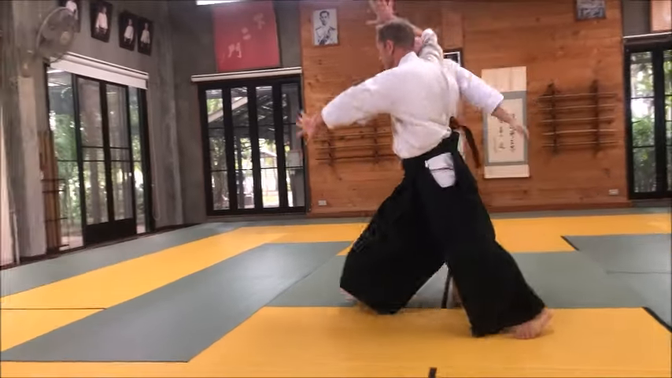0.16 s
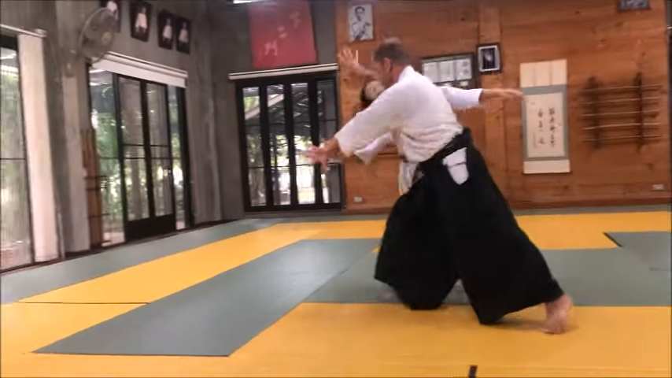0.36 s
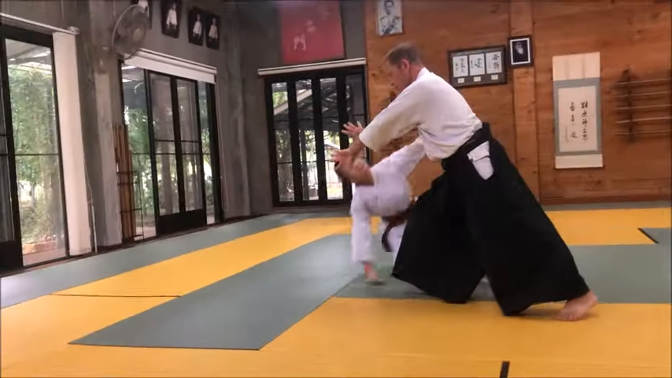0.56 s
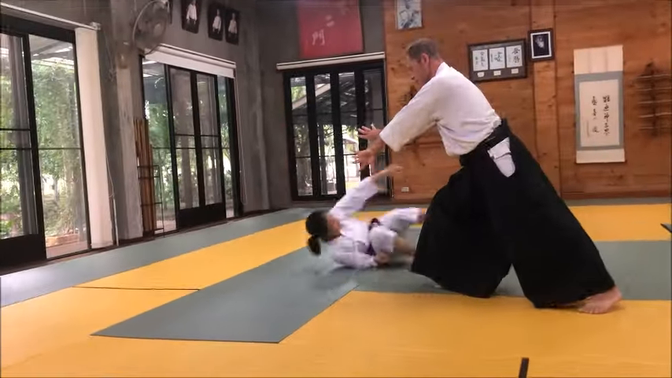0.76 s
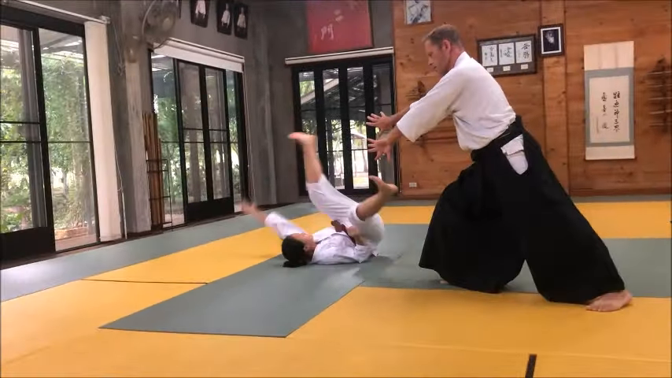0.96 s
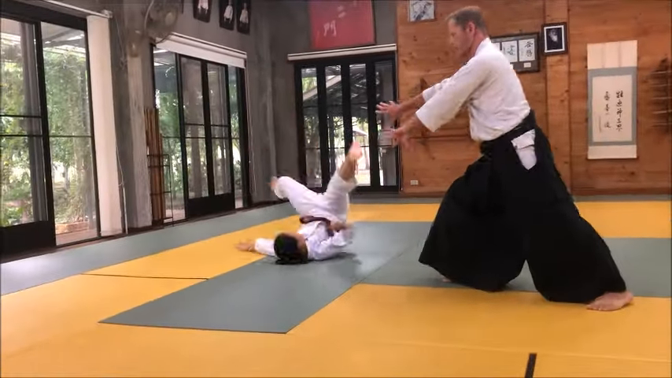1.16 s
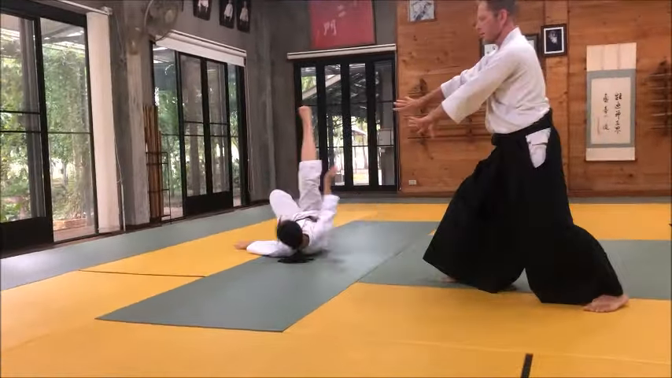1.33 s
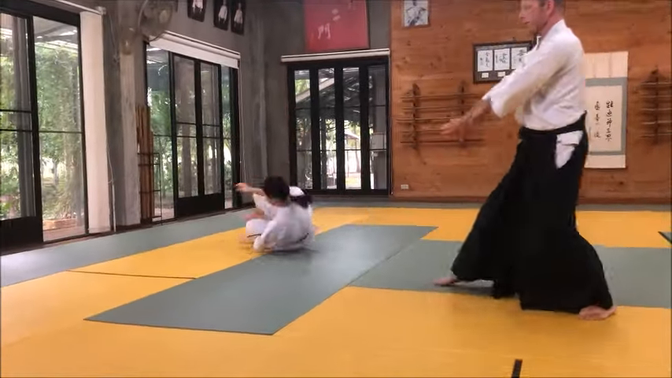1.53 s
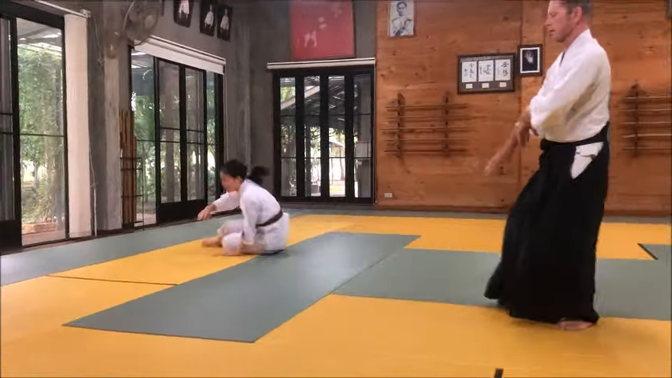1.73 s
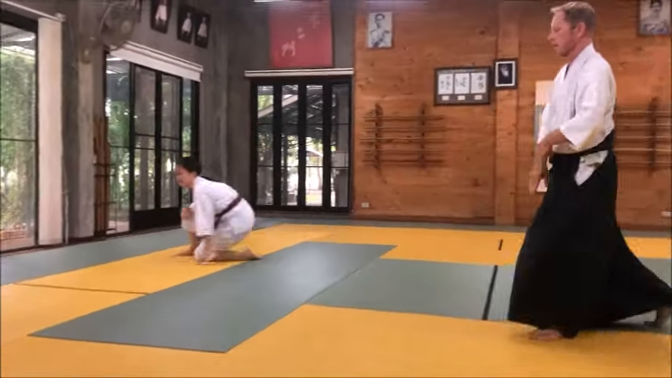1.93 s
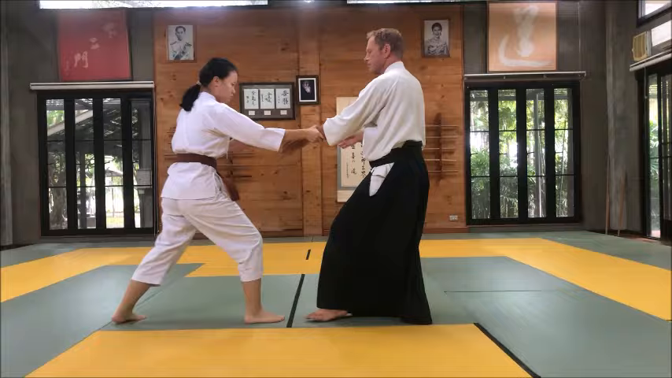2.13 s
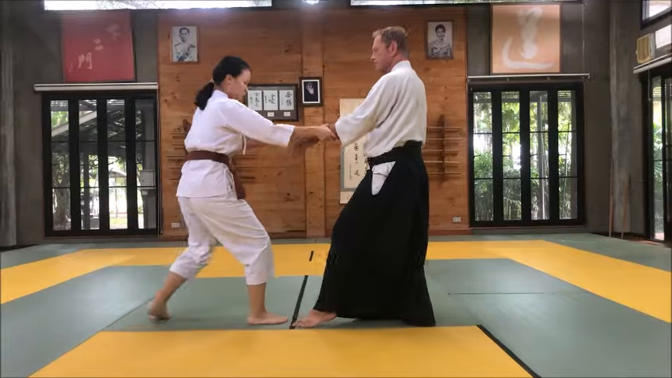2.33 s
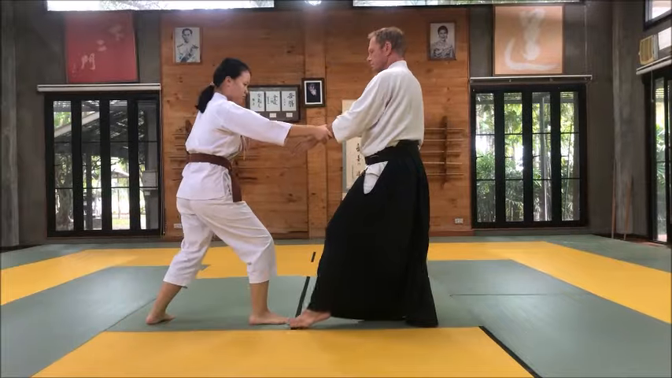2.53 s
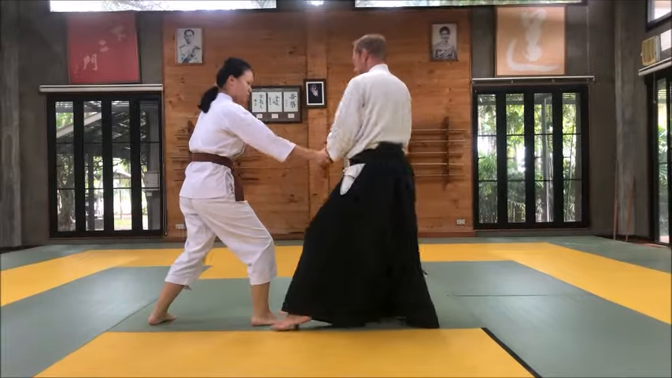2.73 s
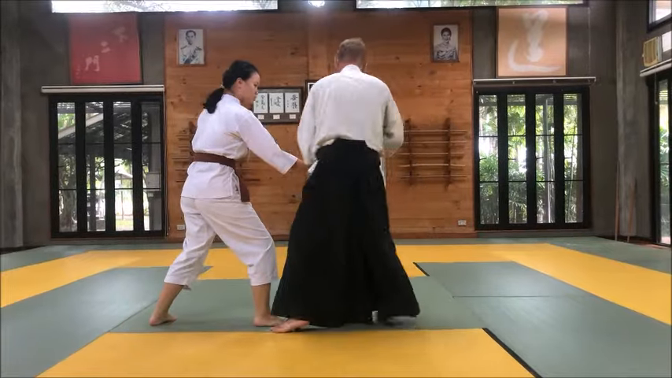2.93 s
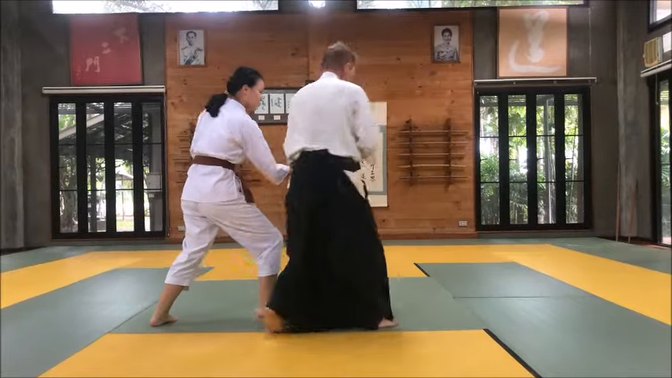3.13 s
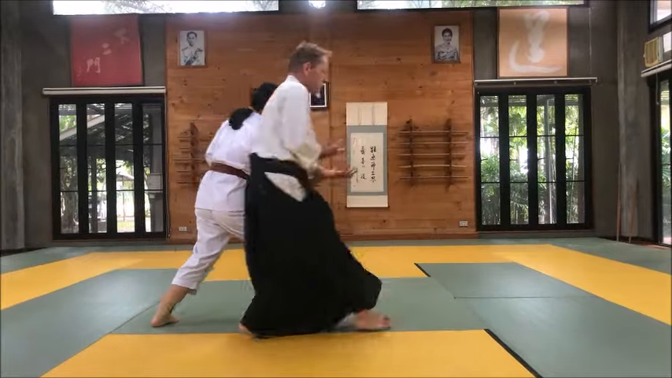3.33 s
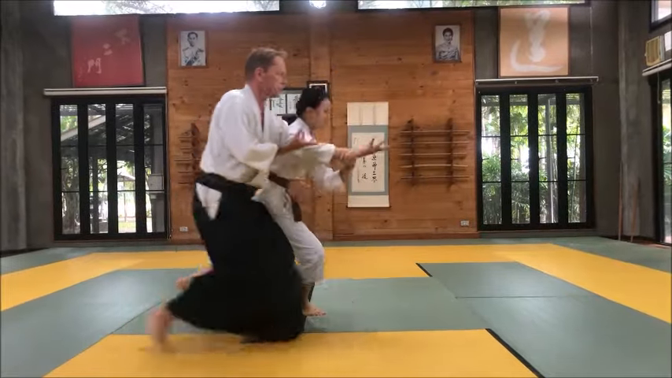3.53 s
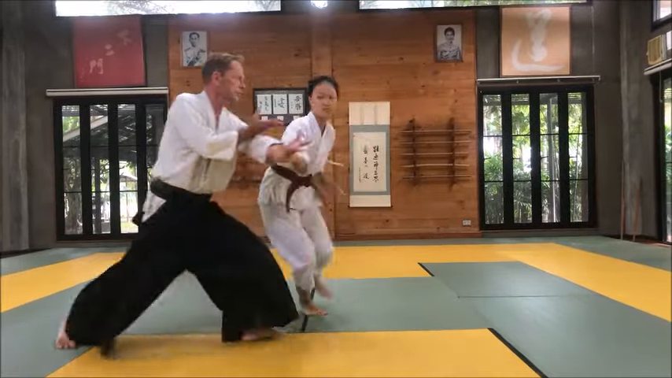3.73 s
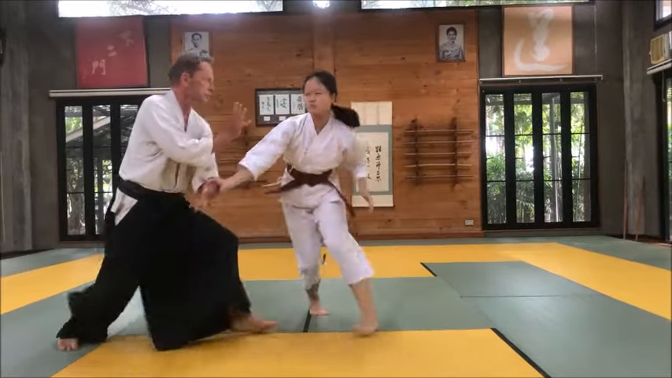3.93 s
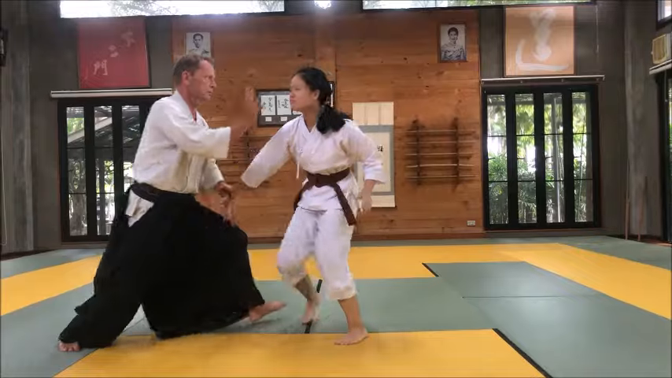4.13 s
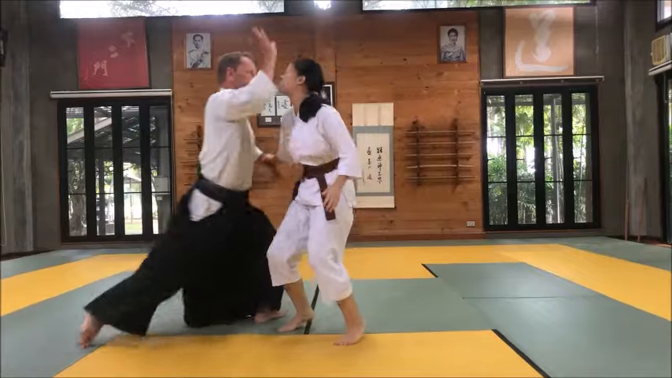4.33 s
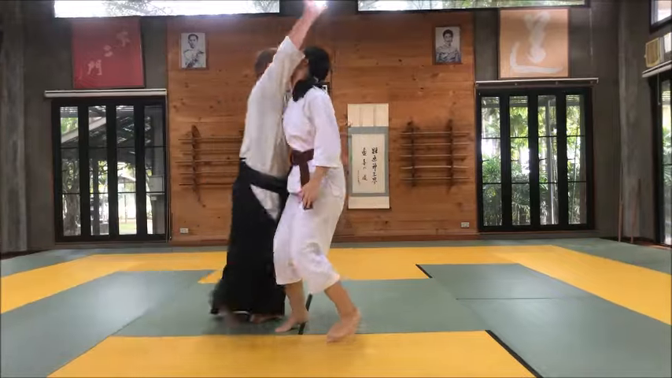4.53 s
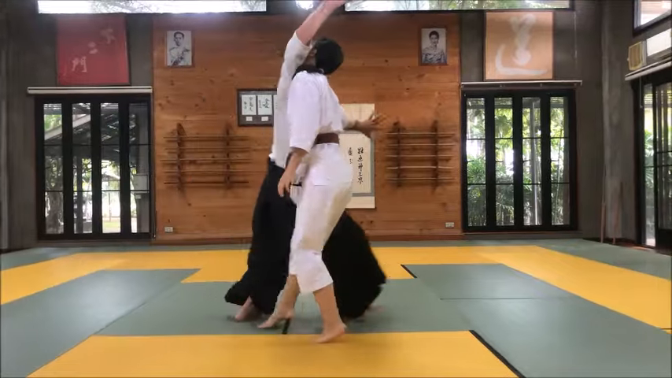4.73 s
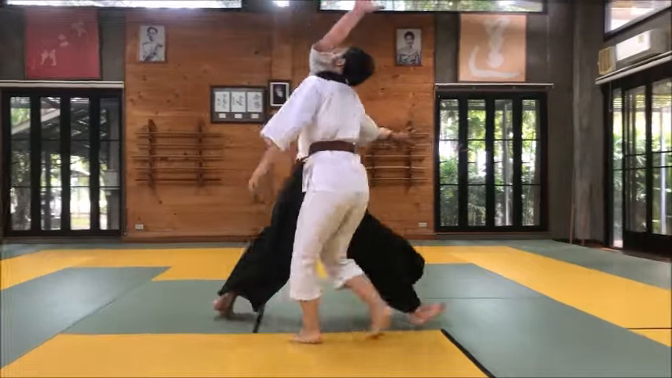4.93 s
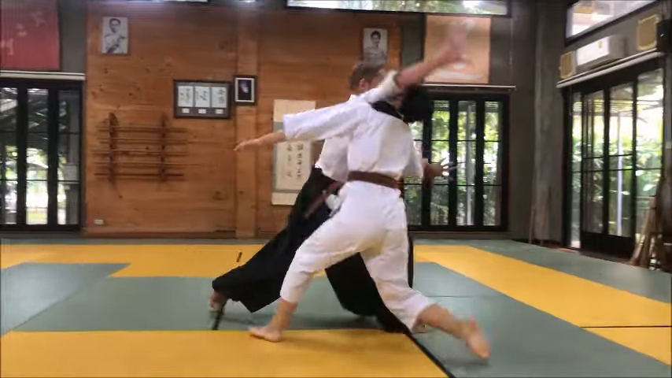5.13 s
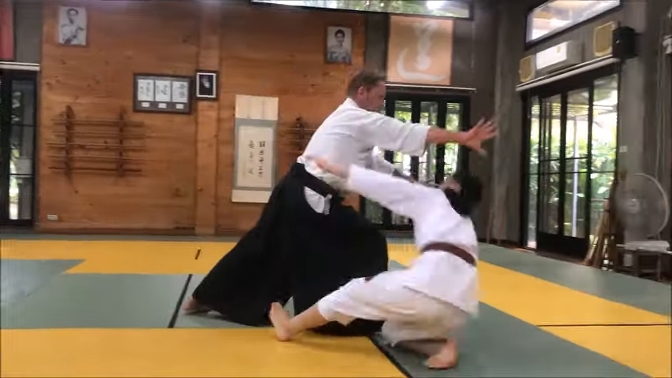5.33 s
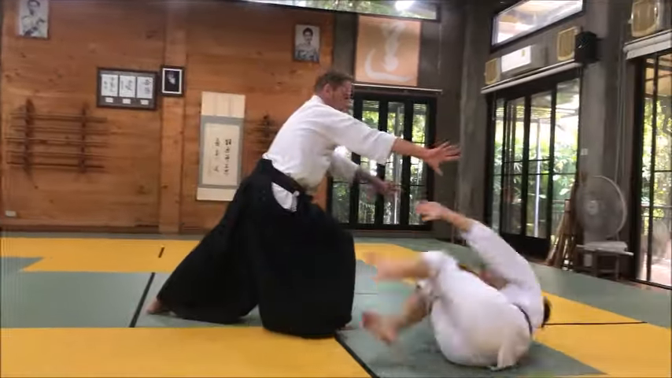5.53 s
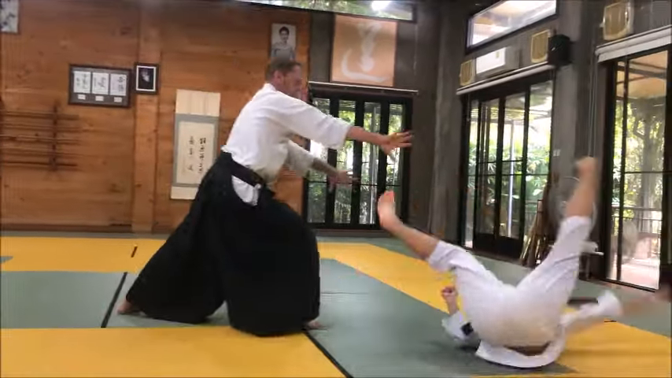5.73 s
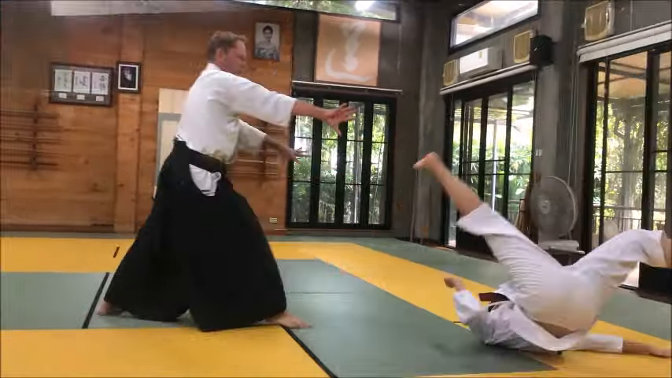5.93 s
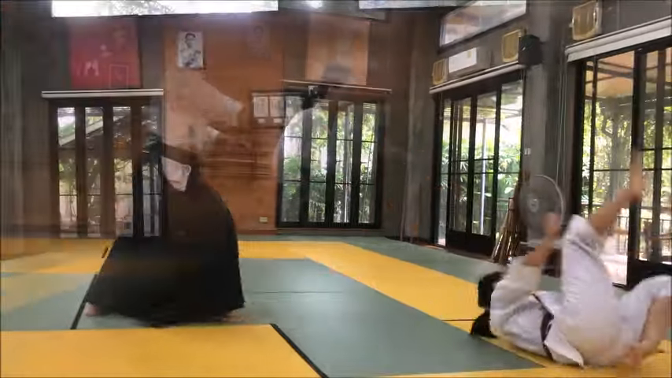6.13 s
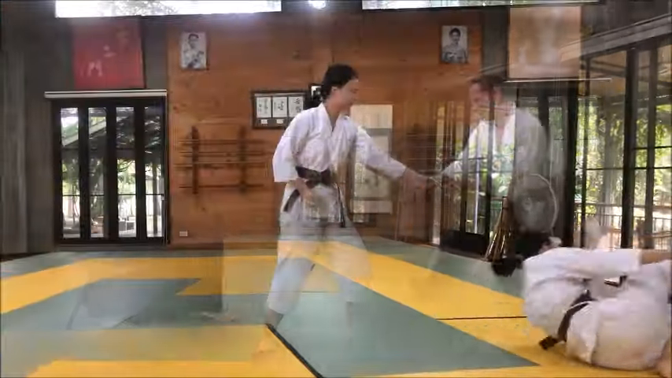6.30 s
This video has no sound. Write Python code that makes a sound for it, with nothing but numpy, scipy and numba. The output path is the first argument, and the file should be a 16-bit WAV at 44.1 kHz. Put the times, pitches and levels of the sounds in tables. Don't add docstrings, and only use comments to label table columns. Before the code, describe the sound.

Soft steps, rolling weight and vinyl scuffs over fan hum, with a sharp mat slap early and a louder, deeper one near the end.

```python
import sys
import numpy as np
from scipy import signal
from scipy.fft import rfft, irfft, next_fast_len
from scipy.io import wavfile
from scipy.ndimage import uniform_filter1d
from numba import njit

SR = 44100
rng = np.random.default_rng(int(sys.argv[2]) if len(sys.argv) > 2 else 0)


def master_out(mix):
    frames = np.transpose(np.atleast_2d(mix))
    ceiling = np.clip(frames, -1, 1)
    pcm = np.round(ceiling * 32767).astype(np.int16)
    wavfile.write(sys.argv[1], SR, pcm)


def magnitude_from_level(level_db):
    exponent = np.asarray(level_db, float) / 20
    return 10 ** exponent


N = 285062
T = np.arange(N) / SR

# frequency in Hz, density in dB per Hz.
AIR_SPECTRUM = [(20, -45), (50, -14), (75, -24), (100, -10.5), (135, -16), (204, -11.5), (364, -13),
                (600, -10), (750, -13), (950, -20), (1400, -25.5), (3000, -34.5), (8000, -37.5),
                (16000, -43)]
AIR_DB = -48
# frequency in Hz, width in Hz, level in dB, change in dB from 2.2 s on.
MOTORS = [(100, 27, -54, 1), (295, 2.7, -54.5, -6.5)]
HUM_CHANGE_S = 2.2
# frequency in Hz, density in dB per Hz.
CORNER_SPECTRUM = [(35, -24.5), (60, 11), (108, -18), (217, -3), (294, -10), (500, -10), (800, -12.5),
                   (1400, -18.5), (2520, -22), (6140, -26.5), (11000, -32), (16000, -33)]
CORNER_S, CORNER_DB = 5.843, -38

# start in seconds, level in dB, time held in seconds, hiss centre in Hz.
SCUFFS = [(.68, -67, 0.082, 9500), (.78, -63.5, 0.085, 8000), (2.25, -64, .07, 7450),
          (3.06, -71, 0.092, 9000), (3.53, -58, .025, 10500), (3.675, -60.5, 0.036, 9900),
          (3.81, -68, .03, 8000), (4.565, -60, 0.091, 7450), (5.078, -59, .03, 10500),
          (5.13, -62, .05, 7000), (5.40, -65, .17, 7440), (5.685, -66, 0.0099, 10000)]
GRIP_S, SLIDE_T60_S = 0.014, 0.51
SQUEAKS_HZ = [7500., 8700., 10500., 11800., 15100.]
SQUEAK_DB, SQUEAK_T60_S = -1.5, 0.27

# start in seconds, weight on the sprung floor in dB,
# weight on the foam in dB, time held in seconds.
WEIGHTS = [(.02, -53, -55, .05), (.40, -49, -54, 0.11), (0.67, -35.5, -35.5, 0.15), (.94, -48, -44.5, 0.14),
           (1.63, -50, -41, .03), (1.69, -45, -47.5, .04), (1.92, -46, -50.5, 0.051),
           (2.13, -49, -55, 0.018), (2.26, -46, -48, 0.052), (3.07, -69, -54, 0.036),
           (3.28, -59, -51, 0.061), (3.55, -49, -52.5, 0.17), (4.19, -43.5, -45, 0.047),
           (4.32, -51.5, -54, 0.1), (4.76, -56, -51, 0.069), (4.95, -45, -52, .07), (5.07, -44, -66, 0.054),
           (5.17, -43, -44, 0.034), (5.30, -45, -49.5, 0.072), (5.41, -36, -39, 0.14),
           (5.60, -47, -45, 0.21), (5.80, -45, -49, 0.069)]
SINK_S, FLOOR_T60_S, FOAM_T60_S = 0.021, 0.69, 0.58
# level on the floor, level on the foam, in dB.
FIDGET_DB = [-60.5, -55.5]
FLOOR_HZ, SAG_HZ_PER_DB = 88, 1.0
# frequency in Hz, width in Hz, gain in dB.
FLOOR_MODES = [(57, 13.5, 3), (157.4, 45, -8)]
# frequency in Hz, width in Hz, gain in dB.
FOAM_MODES = [(232, 62, 4), (330, 29.4, 7), (441, 86, 4.5), (594, 125, -7)]
# start in seconds, level in dB, pitch in Hz.
THUDS = [(0.798, -26, 57), (1.219, -15, 145), (1.249, -12.5, 225), (1.679, -32, 53), (2.139, -36, 103),
         (4.20, -49, 100), (5.055, -35, 200), (5.081, -32, 130), (5.175, -33.5, 110), (5.365, -31.5, 91),
         (5.489, -27, 91), (6.03, -35, 213)]
# start in seconds, tick in dB, tick pitch in Hz, foam pop in dB, pop pitch in Hz.
TAPS = [
    (.686, -50, 13000, -32, 330),
    (.906, -54, 2000, -32, 620),
    (2.251, -49, 3800, -38, 300),
    (5.417, -54, 2200, -23, 385),
]

# start in seconds, flutter in dB, flutter pitch in Hz, hall ring in dB.
SLAPS = [
    (1.2103, -14, 2060, -16),
    (5.9693, -9.5, 1530, -14.5),
]
# foam pop in dB, pop pitch in Hz, floor boom in dB, boom pitch in Hz.
UNDER_SLAPS = [
    (-7, 325, -32.5, 49.3),
    (-3, 302, -28.5, 54.3),
]
FLUTTER_GLIDE = [0.11, 0.71]
OVERTONE_DB = [-8.5, -12]
FLAP_S = [0.00188, 0.0022]
SPIT_DB = [-31, -26.5]
# delay in seconds, level in dB.
ECHOES = [
    [(.0085, -2), (.0115, -9), (.016, -12), (.020, -24), (.026, -14), (.030, -23), (.039, -5)],
    [(.0080, -0.5), (.0105, -4), (.0155, 1.5), (.0195, -4), (.0235, -2), (.033, -6), (.041, -17)],
]
# frequency in Hz, density in dB per Hz.
RING_SPECTRA = [
    [(45, -27), (70, -8.5), (110, -2), (142, -17.5), (208, -2.5), (336, -3.5), (494, -4.5), (600, -10),
     (1200, -20.5), (2100, -23), (3000, -23), (5000, -29), (10000, -36.5), (16000, -34)],
    [(45, -14), (70, -7), (90, -3.5), (150, -7.5), (250, 1), (400, -4.5), (579, -11), (900, -19),
     (1340, -28.5), (2200, -31.5), (3300, -31.5), (5000, -34.5), (10000, -35.5), (16000, -43)],
]
BUILD_S = [0.014, 0.0014]
# frequency in Hz, decay by 60 dB in seconds.
HALL_T60 = [(70, 1.01), (250, 0.89), (700, 0.96), (2000, 1.19), (3200, 0.64), (4500, 1.15), (5500, 0.98),
            (8000, 0.96), (15000, 0.48)]
BANDS_HZ = 32 * 2 ** np.arange(0, 9.1, 1 / 3)

# frequency in Hz, gain in dB.
MICROPHONE = [(800, -0.5), (1350, 2.5), (1600, -2), (2500, -2.5), (3300, -3.5), (3900, -0.5), (5000, 0.5),
              (6500, -2), (9500, -3.5), (11800, 0), (13200, -6), (15500, -6)]
# frequency in Hz, gain in dB.
UPPER_LIMIT = [(15550, 0), (15700, -4), (15900, -50)]
# centre in seconds, gain in dB, length in seconds.
DROPOUTS = [(.02, -14, .02), (.49, -14, .02), (.592, -16, .02), (1.11, -18, .022), (1.45, -12, .016),
            (1.494, -12, .016), (1.918, -18, .022), (3.113, -18, .02), (3.797, -20, .016), (4.16, -14, .02),
            (4.36, -14, .018), (4.412, -18, .02), (5.066, -35, .034), (5.674, -18, .015), (5.951, -10, .02)]


def level(x, db):
    return x * magnitude_from_level(db) / np.sqrt(np.mean(x ** 2))


def on_log(hz, table):
    table = np.array(table)
    return np.interp(np.log(np.maximum(hz, 1)), np.log(table[:, 0]), table[:, 1])


def colour(x, table):
    size = next_fast_len(len(x))
    hz = np.arange(size // 2 + 1) * SR / size
    return irfft(rfft(x, size) * magnitude_from_level(on_log(hz, table)), size)[:len(x)]


@njit
def resonator(x, hz, width):
    y, band_state, low_state = np.empty(len(x)), 0., 0.
    for i in range(len(x)):
        g, k = np.tan(np.pi * hz[i] / SR), width[i] / hz[i]
        v = (band_state + g * (x[i] - low_state)) / (1 + g * (g + k))
        band_state = 2 * v - band_state
        low_state += 2 * g * v
        y[i] = k * v
    return y


def band(x, hz, width):
    return resonator(x, hz * np.ones(len(x)), width * np.ones(len(x)))


def double_band(x, hz, width):
    return band(band(x, hz, width), hz, width)


def even(x, span_s, share):
    power = uniform_filter1d(x ** 2, size=int(span_s * SR)) + 1e-12
    return level(x / power ** (share / 2), 0)


def walk(rate):
    k = int(SR / rate)
    held = np.repeat(rng.standard_normal(N // k + 1), k)
    return 4 / 5 * uniform_filter1d(uniform_filter1d(held, k), k)[:N]


def grains(rate, spread_db):
    struck = rng.random(N) < rate / SR
    return struck * rng.standard_normal(N) * magnitude_from_level(spread_db * rng.exponential(size=N))


def play(starts, dbs, holds, attack_s, t60):
    coarse = T[::32]
    t = coarse - starts[:, None]
    fall_db = 60 * np.maximum(t - attack_s - holds[:, None], 0) / t60
    gains = np.clip(t / attack_s, 0, 1) * magnitude_from_level(dbs[:, None] - fall_db)
    return np.interp(T, coarse, np.sqrt(np.sum(gains ** 2, axis=0)))


def add(out, s, x):
    i = int(s * SR)
    out[i:i + len(x)] += x[:len(out) - i]


def fans():
    return level(colour(rng.standard_normal(N), AIR_SPECTRUM), AIR_DB) * magnitude_from_level(.5 * walk(2.86))


def motor_hum():
    out = np.zeros(N)
    for hz, width, db, change_db in MOTORS:
        hum = band(rng.standard_normal(N), hz, width) + 0.17 * np.sin(2 * np.pi * hz * T)
        out += level(hum, db) * magnitude_from_level(change_db * (T > HUM_CHANGE_S))
    return out


def corner_hiss():
    return level(colour(rng.standard_normal(N), CORNER_SPECTRUM), CORNER_DB) * (T > CORNER_S)


def scuffs():
    s, db, held, hiss_hz = np.transpose(SCUFFS)
    hz = hiss_hz[np.maximum(np.searchsorted(s, T) - 1, 0)]
    slips = grains(12000, .8)
    hiss = level(double_band(slips, hz, 2.8 * hz) * np.sqrt(9000 / hz), 0)
    squeaks = np.zeros(N)
    for centre in SQUEAKS_HZ:
        squeaks += level(band(slips, centre, 350.) * magnitude_from_level(5 * walk(25)), SQUEAK_DB - 7)
    squeak_db = db + 20 * np.log10(np.clip((hiss_hz - 7000) / 3000, .1, 1))
    out = hiss * play(s, db, held, GRIP_S, SLIDE_T60_S)
    return out + squeaks * play(s, squeak_db, held, GRIP_S, SQUEAK_T60_S)


def weight_shifts():
    s, floor_db, foam_db, held = np.transpose(WEIGHTS)
    floor_fidget = magnitude_from_level(FIDGET_DB[0] + 3.4 * walk(5.64))
    foam_fidget = magnitude_from_level(FIDGET_DB[1] + 5.9 * walk(9))
    on_floor = np.hypot(play(s, floor_db, held, SINK_S, FLOOR_T60_S), floor_fidget)
    on_foam = np.hypot(play(s, foam_db, held, SINK_S, FOAM_T60_S), foam_fidget)
    sag_hz = SAG_HZ_PER_DB * np.maximum(20 * np.log10(on_floor) + 52, 0)
    hz = FLOOR_HZ - sag_hz
    pushes = grains(1500, 0.76)
    floor = double_band(pushes, hz, 0.71 * hz)
    for mode_hz, width, db in FLOOR_MODES:
        floor = floor + magnitude_from_level(db) * double_band(pushes, mode_hz, width)
    foam = np.zeros(N)
    for mode_hz, width, db in FOAM_MODES:
        foam += magnitude_from_level(db) * double_band(pushes, mode_hz, 1.44 * width)
    return even(floor, 0.0235, 0.64) * on_floor + even(foam, 0.0245, 1.0) * on_foam


def pop(db, hz, lag_s):
    turns = hz * np.maximum(T[:8000] - lag_s, 0)
    shape = (turns / .7 * np.exp(1 - turns / .7)) ** 1.6
    return -magnitude_from_level(db) * shape * np.sin(2 * np.pi * (turns + 0.084 * (1 - np.exp(-turns / 0.22))))


def crack(db, hz, length_s, hiss_db):
    t = T[:400]
    shape = np.clip(t / length_s, 0, 1) ** 0.61 * np.exp(-np.maximum(t - length_s, 0) / 0.00082)
    noise = rng.standard_normal(2000)
    tone = level(double_band(noise, hz, .9 * hz)[-400:], db)
    hiss = level(band(noise, 7800.0, 12000.0)[-400:], db + hiss_db)
    return shape * (tone + hiss)


def footfalls():
    out = np.zeros(N)
    for s, db, hz in THUDS:
        add(out, s, pop(db, hz, 0))
    for s, tick_db, tick_hz, pop_db, pop_hz in TAPS:
        add(out, s, crack(tick_db, tick_hz, 0.0014, -7.0))
        add(out, s, pop(pop_db, pop_hz, 0.0017))
    return out


def hall_ring(table, db, build_s):
    t = T[:int(1.6 * SR)]
    hiss = level(even(colour(rng.standard_normal(len(t)), table), 0.0057, 0.11), db)
    spectrum = rfft(hiss)
    hz = np.maximum(np.arange(len(t) // 2 + 1) * SR / len(t), 1)
    out = np.zeros(len(t))
    for centre in BANDS_HZ:
        share = np.clip(1 - abs(3 * np.log2(hz / centre)), 0, 1)
        out += irfft(spectrum * share, len(t)) * magnitude_from_level(-60 * t / on_log(centre, HALL_T60))
    unbuilt = np.exp(-np.maximum(t - .007, 0) / build_s)
    return out * (1 - unbuilt + 0.09 * unbuilt * (t > .002))


def floor_boom(db, hz):
    t = T[:SR]
    swell = (1 - np.exp(-t / 0.024)) ** 2 * magnitude_from_level(-60 * t / 0.68)
    return magnitude_from_level(db + 16.5) * swell * np.sin(2 * np.pi * hz * t)


def flutter(db, hz, glide, overtone_db, length_s):
    t = T[:300]
    shape = np.clip(t / length_s, 0, 1) ** 0.99 * np.exp(-np.maximum(t - length_s, 0) / 0.00038)
    wobble = uniform_filter1d(rng.standard_normal(len(t)), size=12)
    pitch = hz * (1 - glide * np.clip(t / 0.004, 0, 1)) * (1 + 0.073 * wobble)
    phase = 2 * np.pi * np.cumsum(pitch) / SR
    overtones = sum(np.cos(k * phase) / (k - 1) for k in range(2, 6))
    return magnitude_from_level(db) * shape * (np.cos(phase) + .27 * np.cos(phase / 2) + magnitude_from_level(overtone_db) * overtones)


def slaps():
    out = np.zeros(N)
    for i, (s, flap_db, flap_hz, hall_db) in enumerate(SLAPS):
        pop_db, pop_hz, boom_db, boom_hz = UNDER_SLAPS[i]
        add(out, s, flutter(flap_db, flap_hz, FLUTTER_GLIDE[i], OVERTONE_DB[i], FLAP_S[i]))
        add(out, s, crack(SPIT_DB[i], 3700.0, 0.0027, 2.6))
        add(out, s, pop(pop_db, pop_hz, 0.00245))
        for lag, db in ECHOES[i]:
            add(out, s + lag - .0003, crack(SPIT_DB[i] + db - 4.0, 3600.0, 0.0015, 7.8))
            add(out, s + lag, pop(pop_db + db - 5.5, 1.13 * pop_hz, 0.00169))
        add(out, s, floor_boom(boom_db, boom_hz))
        add(out, s, hall_ring(RING_SPECTRA[i], hall_db, BUILD_S[i]))
    return out


def drop_treble(x):
    out, size = x.copy(), 4096
    hz, t = np.arange(size // 2 + 1) * SR / size, T[:size] - T[size // 2]
    kept = rng.random((len(DROPOUTS), 120)) < np.linspace(.22, -.05, 120)
    padded = np.pad(x, size)
    for (s, db, length_s), strips in zip(DROPOUTS, kept):
        i = int(s * SR) + size // 2
        lost = (hz > 1700) * np.where(strips[(hz // 200).astype(int)], -.8, 1)
        window = np.exp(-abs(2 * t / (.95 * length_s)) ** 4)
        piece = irfft(rfft(padded[i:i + size]) * lost, size) * window * (magnitude_from_level(db) - 1)
        start = i - size
        out[max(start, 0):start + size] += piece[max(-start, 0):]
    return out


def scene():
    background = fans() + motor_hum() + corner_hiss()
    return (background + scuffs() + weight_shifts() + footfalls() + slaps())[None]


def band_limit(x):
    return signal.sosfilt(signal.butter(12, 16760, fs=SR, output="sos"), x)


def record(dry):
    heard = colour(colour(dry[0], MICROPHONE), UPPER_LIMIT)
    mix = drop_treble(heard)[None]
    return band_limit(mix)


dry = scene()
out = record(dry)
master_out(out)
```